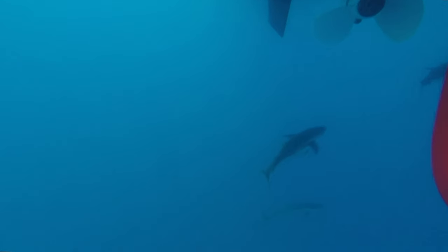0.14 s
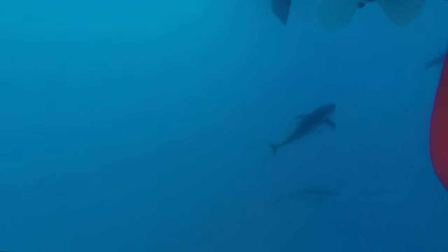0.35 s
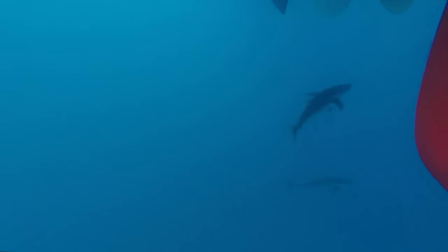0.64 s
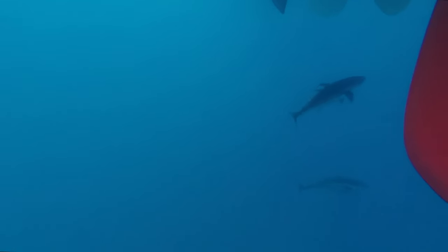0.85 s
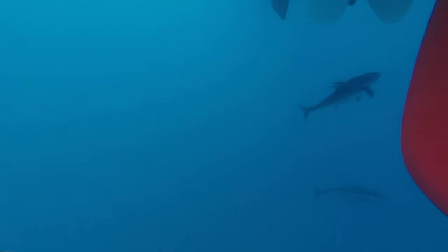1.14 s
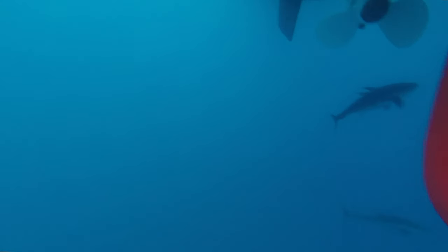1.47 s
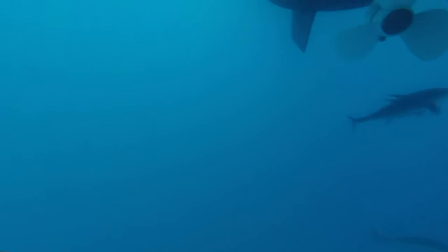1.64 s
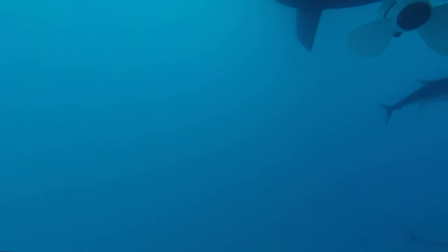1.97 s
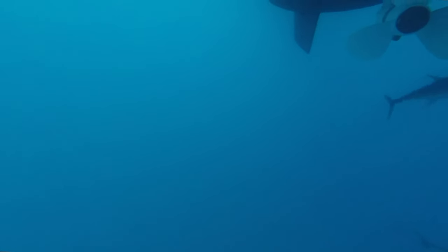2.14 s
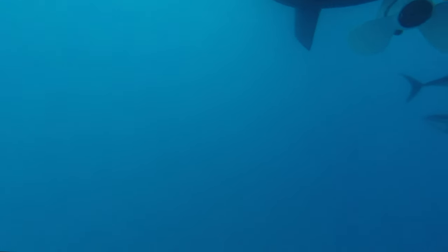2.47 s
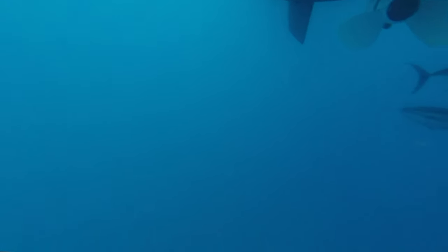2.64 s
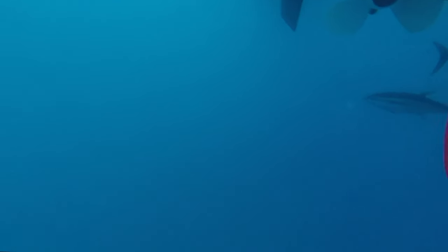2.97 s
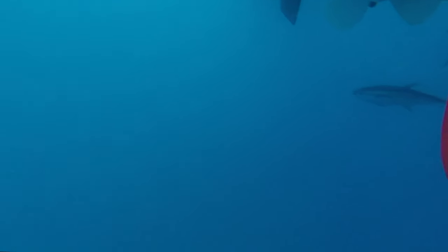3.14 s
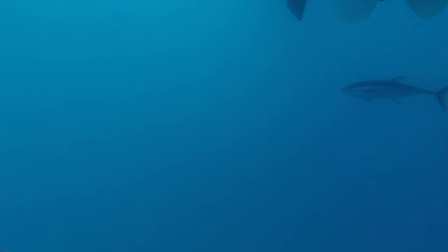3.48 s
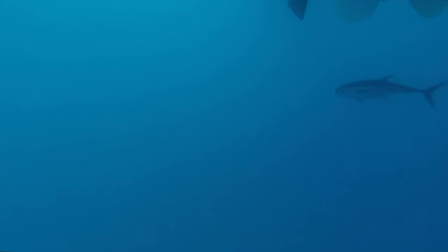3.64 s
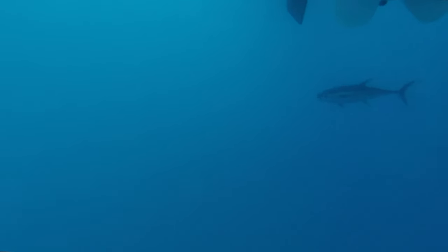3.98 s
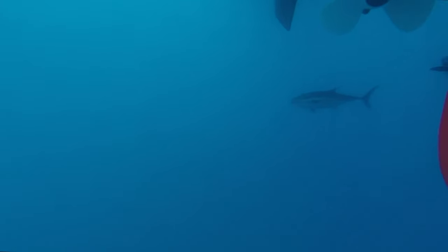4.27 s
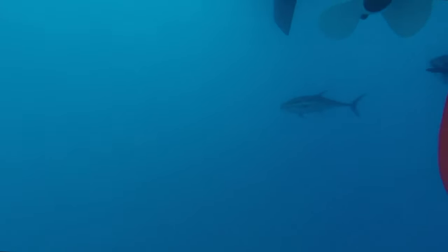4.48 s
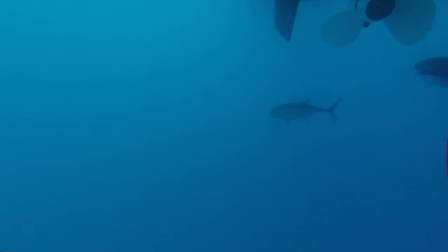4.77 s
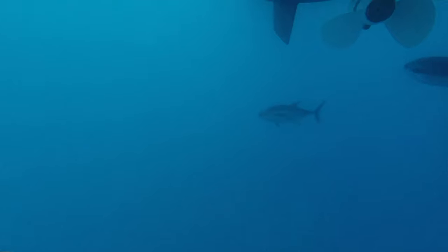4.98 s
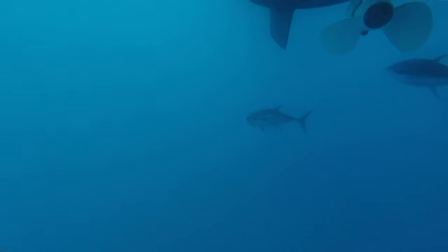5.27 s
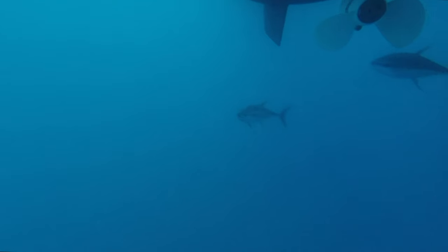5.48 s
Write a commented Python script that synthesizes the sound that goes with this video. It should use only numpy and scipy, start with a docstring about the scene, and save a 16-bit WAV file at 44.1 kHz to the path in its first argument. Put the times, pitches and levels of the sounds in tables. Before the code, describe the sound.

A close, muffled underwater sound: water presses and shoves the casing in irregular low booms over a soft mid-low wash. Rounded bubble tones come in bursts, densest early on. A few dry mount clicks fall near one second and between about three and four and a half. Low surges peak in the middle and fade late, leaving wash, odd bubbles and faint hiss. The fish make no sound.

```python
"""Underwater housing beside a hull

A camera in a waterproof housing is held under water beside a boat hull at sea.
Band-shaped noise gives the muffled rumble and wash of the flow; smooth pulses press on the housing.
Shoves excite damped housing modes as dull thumps, and bubbles ring as short tones or fuzzy clouds.
Dispersive bending waves make the mount click; tiny noise ticks sit in a nearly steady, coloured hiss."""
import sys
import numpy as np
from scipy.fft import rfft, irfft, next_fast_len
from scipy.io import wavfile
from scipy.ndimage import uniform_filter1d, map_coordinates

SR = 44100
rng = np.random.default_rng(int(sys.argv[2]) if len(sys.argv) > 2 else 0)


def inscribe(sig):
    """Save sig as 16-bit PCM at rate SR to the path in sys.argv[1].

    A 1-D sig is mono; a 2-D sig holds one channel per row.
    Samples are clipped to [-1, 1] before scaling.
    """
    pcm = np.round(np.clip(np.atleast_2d(sig).T, -1, 1) * 32767)
    wavfile.write(sys.argv[1], SR, pcm.astype(np.int16))


N = 247401  # length [samples]


def amp(db):
    """Logarithmic level: decibels to linear gain."""
    return 10 ** (np.asarray(db) / 20)


def unit(x):
    """Normalisation: scale to an rms of 1."""
    return x / np.sqrt(np.mean(x ** 2) + 1e-20)


def along(points, hz):
    """Logarithmic interpolation: (frequency [Hz], value) points read on a log frequency axis."""
    f, v = np.transpose(points)
    return np.interp(np.log(hz + 1), np.log(f + 1), v)


def curves(rows):
    """Linear interpolation: one value per sample for each column after the time."""
    s, *cols = np.transpose(rows)
    return [np.interp(np.arange(N) / SR, s, c) for c in cols]


def wobble(rate):
    """Band-limited fluctuation: a smooth curve through random knots, rate of them a second."""
    knots = rng.standard_normal(int(N * rate / SR) + 4)
    return map_coordinates(knots, [np.arange(N) * rate / SR])


def filtered(x, response):
    """Linear filtering: the spectrum of x times a response of frequency, padded against wrap-around."""
    m = next_fast_len(N + SR // 2)
    spectrum = rfft(x, m) * response(np.fft.rfftfreq(m, 1 / SR))
    return irfft(spectrum, m)[:N]


def coloured(x, spectrum):
    """Spectral shaping: x filtered by a table of levels, at an rms of 1."""
    return unit(filtered(x, lambda hz: amp(along(spectrum, hz))))


def churn(spectrum, even_s):
    """Turbulent noise: coloured noise whose strength stays even over spans longer than even_s."""
    x = coloured(rng.standard_normal(N), spectrum)
    size = max(int(even_s * SR), 2)
    power = uniform_filter1d(uniform_filter1d(x ** 2, size), size)
    return unit(x / np.sqrt(np.abs(power) + 1e-6))


def ring(t, hz, t60, attack):
    """Damped oscillation: one mode decays exponentially after a soft start."""
    return np.sin(2 * np.pi * hz * t) * amp(-60 * t / t60) * (1 - np.exp(-t / attack))


def add(track, s, sound):
    """Superposition: mix a sound into the track at time s."""
    part = track[max(round(s * SR), 0):][:len(sound)]
    part += sound[:len(part)]


# colours of the flow, slowest motion first: (frequency [Hz], relative level [dB per Hz])
HEAVE_COLOUR = [(3, -64), (10, -12), (16, -21.5), (30, -26.5), (200, -120)]
SWELL_COLOUR = [(12, -33), (21, 5.5), (29, -0.5), (36, 2.5), (47, -19.5), (65, -12), (140, -73),
                (600, -120)]
EDDY_COLOUR = [(35, -23), (55, -1.5), (72, -3), (88, 1.5), (105, -7.5), (125, -18.5), (190, -27.5),
               (400, -64), (1500, -120)]
DRUMMING_COLOUR = [(60, -42), (100, -3), (115, 4), (142, 1.5), (160, -17), (230, -56), (500, -120)]
WASH_COLOUR = [(80, -11), (130, -4), (175, 5), (240, -0.5), (330, -2.5), (380, -9), (530, -9), (620, -6.5),
               (780, -16), (1100, -19.5), (2500, -25.5), (8000, -120)]
# slow pressure surges against the housing: (time [s], level before lift [dB])
SURGE_COURSE = [(0, -44), (.11, -30.5), (.19, -33.5), (.3, -32.5), (.48, -31), (.62, -34), (.73, -43.5),
                (.89, -35.5), (1.15, -37), (1.3, -40.5), (1.8, -39.5), (1.87, -28.5), (1.98, -37),
                (2.25, -28.5), (2.42, -35), (2.54, -29.5), (2.73, -28), (2.9, -35.5), (3.2, -32.5),
                (3.48, -32.5), (3.6, -31), (3.8, -30.5), (3.88, -35.5), (4.05, -35), (4.15, -39),
                (4.28, -42.5), (4.6, -36), (4.8, -48.5), (4.91, -40.5), (5.13, -46.5), (5.36, -43),
                (5.61, -46)]
# eddies shed by the housing: (time [s], level before lift [dB])
EDDY_COURSE = [(0, -46.5), (.25, -49), (.58, -46), (.72, -46), (.9, -53), (1.19, -58.5), (1.36, -49),
               (1.7, -48), (1.95, -43.5), (2.2, -48), (2.45, -43), (2.72, -44.5), (2.88, -40.5),
               (3.25, -43), (3.72, -49.5), (4, -47.5), (4.25, -47), (4.47, -47), (4.6, -52.5), (4.92, -53),
               (5.15, -58), (5.35, -54), (5.61, -58)]
# fastest eddies, drumming in a narrow band: (time [s], level [dB])
DRUMMING_COURSE = [(0, -68), (.2, -48), (.7, -50), (1.15, -62), (1.35, -49), (1.7, -56), (2.1, -48.5),
                   (2.5, -60), (2.8, -60), (2.87, -42.5), (3.1, -42), (3.27, -45.5), (3.36, -59),
                   (5.61, -75)]
# wash along the hull: (time [s], level before lift [dB])
WASH_COURSE = [(0, -47), (.25, -49.5), (.7, -49), (1.19, -50.5), (1.4, -49), (1.85, -49.5), (2.2, -52),
               (2.6, -51), (2.85, -49.5), (3.7, -50.5), (4.2, -49), (4.55, -51), (4.85, -49.5),
               (5.61, -49.5)]


def flow(breakup_db=2.5, lumpy_db=2.0, heave_lift_db=-4, swell_lift_db=-2, eddy_lift_db=3, wash_lift_db=-1.28):
    """Flow noise: surges over a slow heave, eddies shed by the housing, and a lumpy wash along the hull."""
    surge_db, = curves(SURGE_COURSE)
    eddy_db, = curves(EDDY_COURSE)
    drumming_db, = curves(DRUMMING_COURSE)
    wash_db, = curves(WASH_COURSE)
    # heave and swell share the course of the surges
    heave = amp(surge_db + heave_lift_db) * churn(HEAVE_COLOUR, even_s=0.2)
    swell = amp(surge_db + swell_lift_db) * churn(SWELL_COLOUR, even_s=0.046)
    eddy_gain = amp(eddy_db + eddy_lift_db + breakup_db * wobble(18))
    eddies = eddy_gain * churn(EDDY_COLOUR, even_s=0.14)
    drumming = amp(drumming_db) * churn(DRUMMING_COLOUR, even_s=0.057)
    wash_gain = amp(wash_db + wash_lift_db + lumpy_db * wobble(60))
    wash = wash_gain * churn(WASH_COLOUR, even_s=0.2)
    return heave + swell + eddies + drumming + wash


# rounded lumps of water press on the housing: (time [s], peak [dB], half width to zero pressure [s])
PRESSURE_LUMPS = [(0.099, -27, 0.011), (0.481, -23, 0.0097), (.58, -28, 0.0091), (2.533, -21.5, 0.0098),
                  (2.724, -19, .009), (2.817, -24, 0.0081), (3.086, -22, 0.0052), (3.195, -32.5, 0.0096),
                  (3.39, -24.5, 0.0092), (3.484, -22.5, 0.011), (3.98, -25.5, 0.01), (4.077, -27.5, 0.011)]


def lumps():
    """Pressure pulse: each lump is one smooth push with a slight suction before and after."""
    out, t = np.zeros(N), np.arange(N) / SR
    for s, db, width in PRESSURE_LUMPS:
        u = (t - s) / width
        out += amp(db) * (1 - u ** 2) * np.exp(-u ** 2 / 2)
    return out


# water shoves the housing: (time [s], boom [dB], knock [dB], rap [dB], knock pitch [ratio to nominal]),
# levels being those of each mode before its soft start and decay
SHOVES = [(0.115, -14.5, -28, -33, 1.12), (.253, -28, -39, -51, 0.94), (0.575, -31, -47, -50, 0.9),
          (1.231, -23, -23, -28, 0.93), (1.273, -44, -30.5, -37, 0.97), (1.494, -30, -28, -35, 0.955),
          (1.645, -51, -35, -34, 1), (1.667, -46, -35, -42, 1.08), (1.71, -42, -46, -36, 1.05),
          (1.949, -33, -29, -35, 0.97), (1.995, -28, -38, -52, 0.85), (2.043, -38, -26.5, -47, 1.16),
          (2.177, -30, -52, -50, 1), (2.728, -18, -26, -34, 1.08), (2.861, -28, -27.5, -37, 0.6),
          (2.927, -23, -44, -47, 1.66), (3.015, -41, -44, -46, 1.6), (3.103, -19, -39, -29, 1.16),
          (3.163, -23, -43, -44, 1.1), (3.274, -25.5, -36, -41, 0.83), (3.533, -32, -29.5, -50, 0.99),
          (3.968, -26, -47, -47, 0.87), (4.189, -25.5, -32, -40, .9), (4.326, -21.5, -38, -35, 0.98),
          (4.472, -28.5, -60, -50, 1), (4.9, -31, -51, -51, 0.85), (5.313, -32, -24, -36, 1.07),
          (5.425, -46, -32, -48, 1.06)]
# housing modes boom, knock and rap: (nominal frequency [Hz], decay by 60 dB [s])
HOUSING_MODES = [(91, 0.13), (185, 0.078), (332, 0.062)]
# colour of the turbulent wake: (frequency [Hz], relative level [dB per Hz])
WAKE_COLOUR = [(60, -42), (140, 9), (260, 1.5), (400, -8.5), (650, -15.5), (1500, -54), (4000, -90)]
PUSH_S = 0.008  # time constant of a shove's build-up
# wake: level against the knock before its fade-in [dB], lead before the shove [s], decay by 60 dB [s]
WAKE_DB, WAKE_LEAD_S, WAKE_T60_S = -14.5, 0.014, 0.18


def thumps(detune=0.028):
    """Modal excitation: shoves ring the water-damped housing amid turbulence that starts just before."""
    out, stir, t = np.zeros(N), np.zeros(N), np.arange(SR // 3) / SR
    for s, *mode_db, knock_pitch in SHOVES:
        scatter = 1 + detune * rng.standard_normal(len(HOUSING_MODES))
        pitch = np.array([1, knock_pitch, 1]) * scatter
        for k, (hz, t60) in enumerate(HOUSING_MODES):
            sign = (-1) ** k  # neighbouring modes start in opposite directions
            add(out, s, sign * amp(mode_db[k]) * ring(t, hz * pitch[k], t60, PUSH_S))
        age = t - WAKE_LEAD_S
        fade_in = np.minimum(t / WAKE_LEAD_S / 2, 1)
        wake = fade_in * amp(mode_db[1] + WAKE_DB - 60 * age / WAKE_T60_S)
        add(stir, s - WAKE_LEAD_S, wake)
    return out + stir * churn(WAKE_COLOUR, even_s=0.025)


# single bubbles, loud and soft, each at its own time and pitch:
# (time [s], level before lift [dB], starting pitch [Hz], decay by 60 dB [s])
SINGLE_BUBBLES = [(.46, -45, 525, .05), (.489, -41, 614, .05), (.532, -44, 670, .04), (.547, -41, 600, .04),
                  (.5935, -36.5, 597, 0.042), (.611, -45, 635, .04), (.627, -44, 520, .08),
                  (.688, -49, 756, 0.05), (.748, -33.5, 643, 0.034), (.768, -49, 775, .05),
                  (.777, -53, 4110, 0.091), (1.112, -47.5, 606, 0.14), (2.335, -41.5, 614.7, 0.034),
                  (2.612, -38.5, 628.4, 0.07), (3.192, -47.5, 1320, 0.055), (3.401, -44, 612, 0.025),
                  (3.416, -41, 545, .03), (3.428, -50, 700, 0.028), (3.438, -44, 593, 0.036),
                  (4.083, -46.5, 2660, .045), (4.113, -48, 2590, .04), (4.416, -42, 600.4, 0.051),
                  (4.819, -40, 617, 0.045), (5.5215, -34.5, 690, 0.021)]
# runs of small bubbles: (start [s], end [s], mean bubble level before lift [dB],
# first central pitch [Hz], last central pitch [Hz])
GURGLE_RUNS = [(0.438, 0.823, -60, 507, 726), (1.271, 2.099, -49.5, 306, 266), (1.45, 2.3, -46, 172, 153),
               (2.473, 2.64, -51.5, 550, 593), (2.748, 3.151, -61, 427, 480), (3.381, 3.476, -59, 440, 600),
               (3.798, 4.393, -54, 490, 610), (4.199, 5, -50, 320, 280), (4.681, 4.949, -56, 593, 640)]


def bubbles(per_s=70, strays_per_s=22, stray_db=-56, stray_hz=610, spread=0.156, scatter_db=2,
            small_t60=0.043, phase_rise=0.29, lift_db=1.5):
    """Bubble resonance: single bubbles, gurgling runs and strays ring as damped tones of rising pitch."""
    out, t = np.zeros(N), np.arange(SR // 8) / SR
    starts = []
    for second in range(N // SR + 1):
        for _ in range(strays_per_s):
            starts.append((rng.uniform(second, second + 1), stray_db, stray_hz))
    for start, end, db, first_hz, last_hz in GURGLE_RUNS:
        for s in np.arange(start, end, 1 / per_s):
            hz = np.interp(s, [start, end], [first_hz, last_hz])
            starts.append((s + rng.uniform(0, 1 / per_s), db, hz))
    small = []
    for s, db, hz in starts:
        level = db + rng.normal(0, scatter_db)
        small.append((s, level, hz * np.exp(rng.normal(0, spread)), small_t60))
    for s, db, hz, t60 in list(SINGLE_BUBBLES) + small:
        # the phase is quadratic in time, so pitch rises by twice phase_rise a second
        add(out, s, amp(db + lift_db) * ring(t, hz * (1 + phase_rise * t), t60, 0.0012))
    return out


# bubble clouds, one list of course points each: (time [s], pitch [Hz], level [dB])
CLOUD_COURSES = [
    [(.44, 516, -66), (.495, 614, -52), (.513, 634, -65), (.535, 661, -53), (.58, 592, -66),
     (.61, 608, -54), (.65, 585, -57), (.69, 633, -55), (.73, 618, -68), (.76, 642, -54), (.78, 600, -56),
     (.82, 600, -71)],
    [(3.395, 623, -60), (3.425, 600, -53), (3.445, 630, -52), (3.475, 620, -64)],
]


def burbles(unrest=160):
    """Collective resonance: a bubble cloud rings as one fuzzy tone of sliding pitch, unrest knots a second."""
    out, t = np.zeros(N), np.arange(N) / SR
    for course in CLOUD_COURSES:
        hz, db = curves(course)
        present = (t > course[0][0]) & (t < course[-1][0])
        inside = uniform_filter1d(1.0 * present, size=300)  # softened edges
        cloud = wobble(unrest) + 1j * wobble(unrest)
        even = cloud / np.sqrt(np.abs(cloud) + 1e-6)  # milder swings of strength
        carrier = np.exp(2j * np.pi * np.cumsum(hz) / SR)
        out += inside * amp(db) * unit(np.real(even * carrier))
    return out


# mount clicks: (time [s], peak of the bare slip [dB], centre [Hz], drop an octave from centre [dB],
# rebound delay [s], rebound level [dB], ring [Hz], ring level [dB], clunk [Hz],
# clunk level before soft start and decay [dB]); rebound and ring are relative to the slip
MOUNT_CLICKS = [(.7485, -43.5, 900, 19, 0.0018, -10, 790, 8, 330, -56),
                (0.9552, -35.5, 1350, 4.5, 0.00345, -8, 1750, 5, 340, -37),
                (0.9983, -37, 1050, 3, 0.0021, -5, 1460, 4, 410, -33),
                (3.3761, -34, 500, 0.8, .0021, -9, 940, 4, 340, -27),
                (4.09, -36, 1300, 13, 0.0041, -11, 1233, 2, 352, -37),
                (4.1612, -42.5, 1100, 2, 0.004, -2.5, 1320, 4, 315, -37),
                (4.394, -44, 1800, 11, .0036, -5, 1943, -3, 334, -38)]
# colour of a click: (frequency [Hz], relative level [dB])
MOUNT_COLOUR = [(40, -60), (150, 0), (340, 17), (500, 17), (630, 12.5), (780, 11.5), (950, 7.5), (1250, 7),
                (1600, 6), (1900, 0.5), (2200, 9), (2450, -7), (2750, 8), (3500, -21), (7000, -45)]
RING_WIDTH_HZ, CLUNK_T60_S = 23, 0.04  # resonance bandwidth; decay of the clunk by 60 dB


def clicks(travel_s=0.00408, scatter=0.046, scatter_t60=0.059, size=4096):
    """Bending-wave dispersion: the mount slips and rebounds, scatters at its ends and rings over a clunk."""
    out, t = np.zeros(N), np.arange(size) / SR
    hz = np.fft.rfftfreq(size, 1 / SR) + 1
    # bending waves are faster at high pitch, so each click is a quick downward chirp
    delay = travel_s * (np.sqrt(1000 / hz) - 1)  # relative to 1 kHz
    chirp = np.exp(-2j * np.pi * np.cumsum(delay) * SR / size)
    for (s, db, centre, drop, rebound_s, rebound_db,
         ring_hz, ring_db, clunk_hz, clunk_db) in MOUNT_CLICKS:
        slip = chirp * amp(along(MOUNT_COLOUR, hz) - drop * np.log2(hz / centre) ** 2)
        rebound = amp(rebound_db) * np.exp(-2j * np.pi * hz * rebound_s)
        echoes = rfft(scatter * rng.standard_normal(size) * amp(-60 * t / scatter_t60))
        ringing = amp(ring_db) / (1 + 1j * (hz ** 2 - ring_hz ** 2) / (hz * RING_WIDTH_HZ))
        # the squared term is a second, weaker rebound
        click = irfft(slip * (1 + rebound + rebound ** 2 + echoes + ringing))
        centred = np.roll(click, size // 2)
        slip_peak = np.abs(irfft(slip)).max()
        add(out, s + 0.00093 - size / 2 / SR, amp(db) * centred / slip_peak)
        add(out, s, amp(clunk_db) * ring(t, clunk_hz, CLUNK_T60_S, 0.0031))
    return out


# colour shared by hiss and ticks: (frequency [Hz], relative level [dB])
HISS_COLOUR = [(100, 7), (900, -1), (1400, -2.5), (2200, 1.5), (2660, 3.5), (3000, -3), (3500, -5.5),
               (4200, -4.5), (5500, -8.5), (5900, 1), (6780, 3), (7150, -4.5), (8300, 0), (9000, -5),
               (10000, -7), (11100, -15), (13000, -18), (15200, -27)]
# narrow humps in that colour: (centre [Hz], distance to 1/e^2 of the lift [Hz], lift [dB])
HISS_HUMPS = [(1625, 150, 3), (4745, 360, 7.5), (7590, 150, 3)]
# tiny bright ticks: (time [s], level before lift and colouring [dB])
BRIGHT_TICKS = [(1.759, -49), (2.814, -53), (4.78, -49.5), (5.064, -50)]


def hiss(hiss_db=-53.0, tick_lift_db=7, tick_t60=0.032, count=90, faint_db=-58):
    """Resonant colouring: a nearly steady hiss and decaying noise ticks share the same resonances."""
    def colour(hz):
        """Resonance: narrow humps raise a broad spectrum."""
        humps = sum(db * np.exp(-2 * ((hz - centre) / width) ** 2) for centre, width, db in HISS_HUMPS)
        return amp(along(HISS_COLOUR, hz) + humps)

    def bright(hz):
        """Spectral tilt: the ticks lose their low end and gain treble."""
        return colour(hz) * amp(along([(1000, -58), (4000, 5), (7000, 6.0), (13000, 0.5)], hz))

    flutter = amp(0.45 * wobble(60))
    steady = unit(filtered(rng.standard_normal(N) * flutter, colour))
    snaps, t = np.zeros(N), np.arange(SR // 20) / SR
    events = [(s, db, tick_t60) for s, db in BRIGHT_TICKS]
    # faint, longer crackles lie scattered between the ticks
    for _ in range(count):
        events.append((rng.uniform(0, N / SR), faint_db + rng.normal(0, 0.81), 0.06))
    for s, db, t60 in events:
        decay = amp(db + tick_lift_db - 60 * t / t60)
        add(snaps, s, decay * rng.standard_normal(len(t)))
    return amp(hiss_db) * steady + filtered(snaps, bright)


def scene():
    """Superposition: all sources add at one microphone inside the housing."""
    water = flow() + lumps() + thumps() + bubbles() + burbles()
    return (water + clicks() + hiss())[None]


TOP_HZ = 15250  # band limit


def record(dry):
    """Band limitation: the camera keeps only what lies below its band limit."""
    return np.array([filtered(channel, lambda hz: hz < TOP_HZ) for channel in dry])


dry = scene()
out = record(dry)
inscribe(out)
```